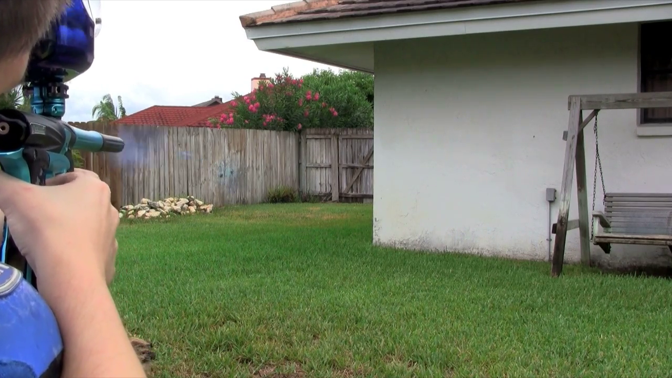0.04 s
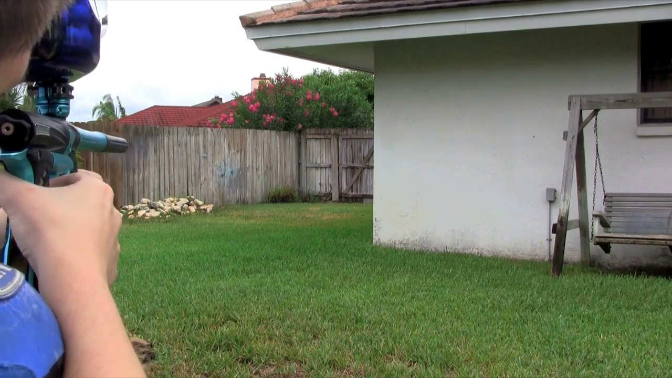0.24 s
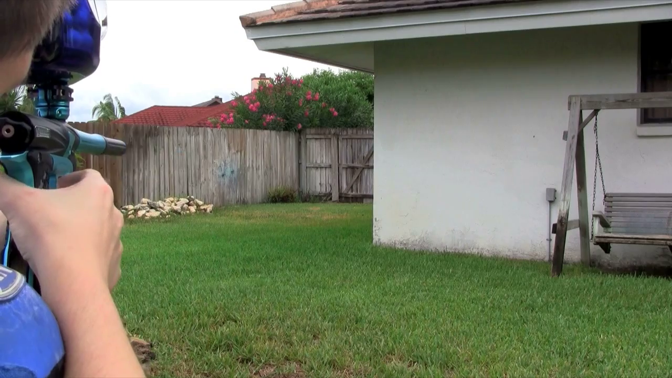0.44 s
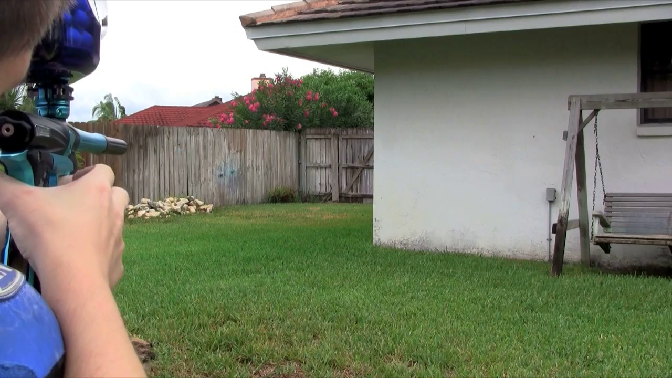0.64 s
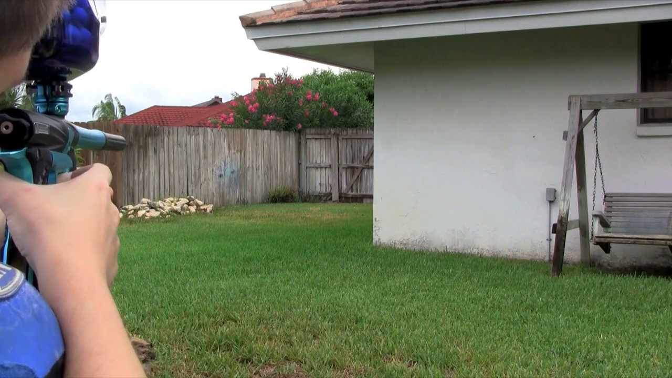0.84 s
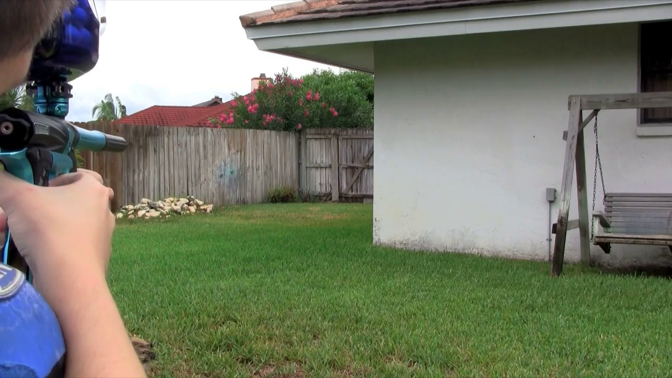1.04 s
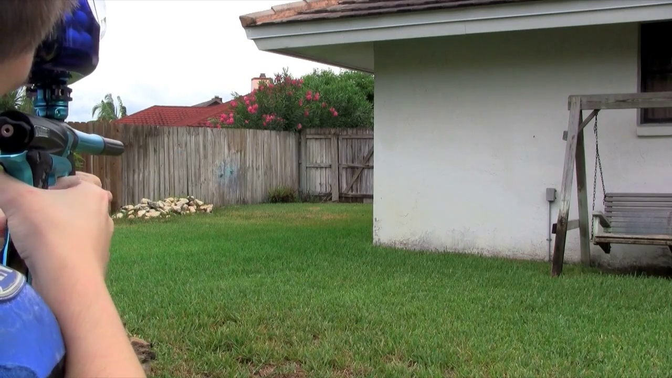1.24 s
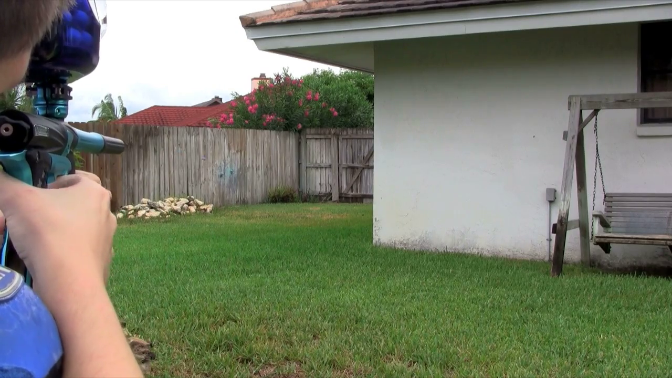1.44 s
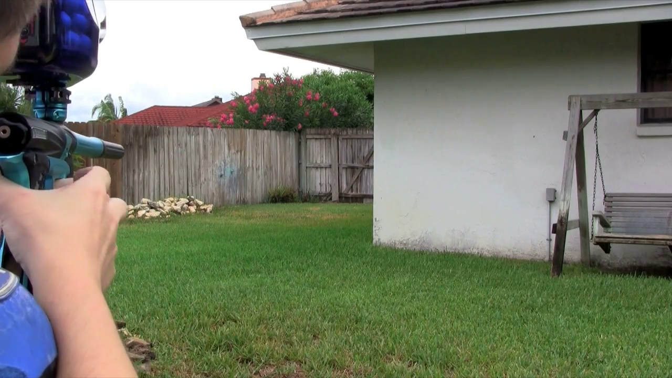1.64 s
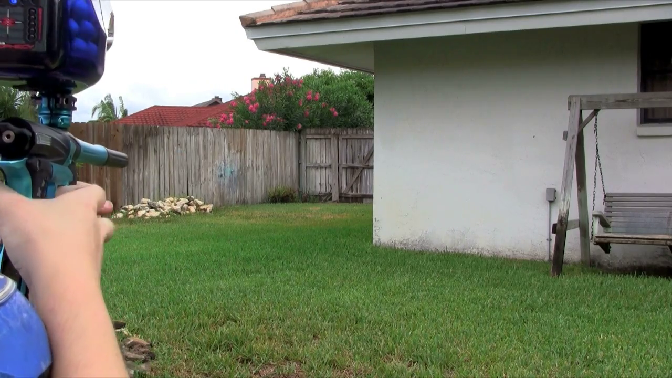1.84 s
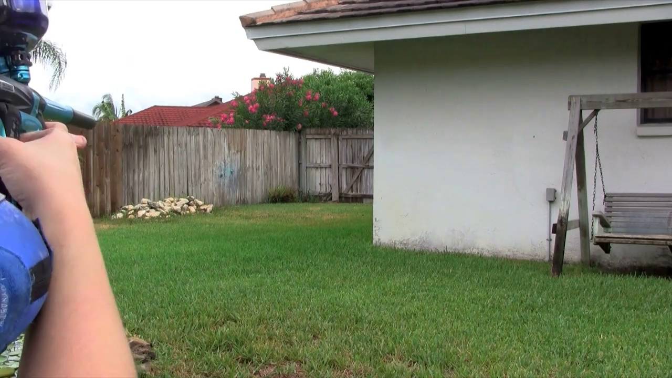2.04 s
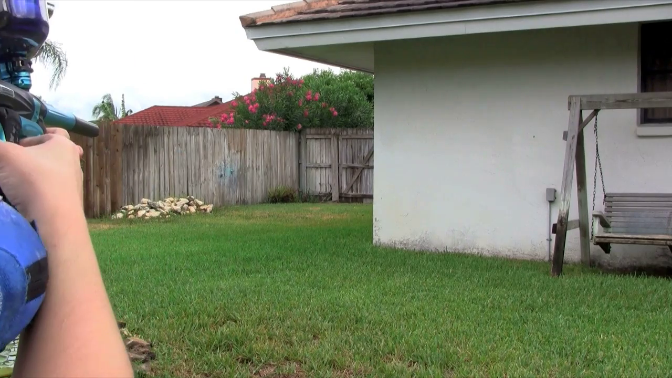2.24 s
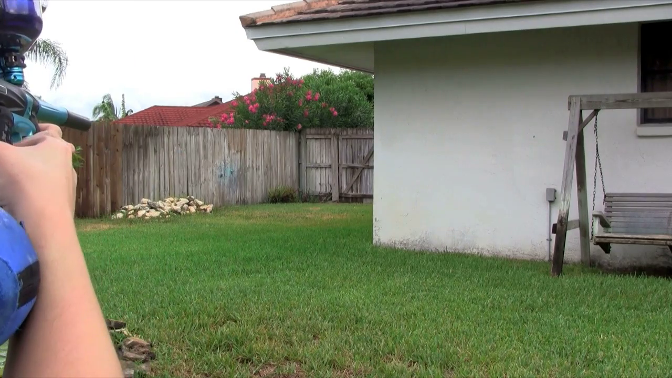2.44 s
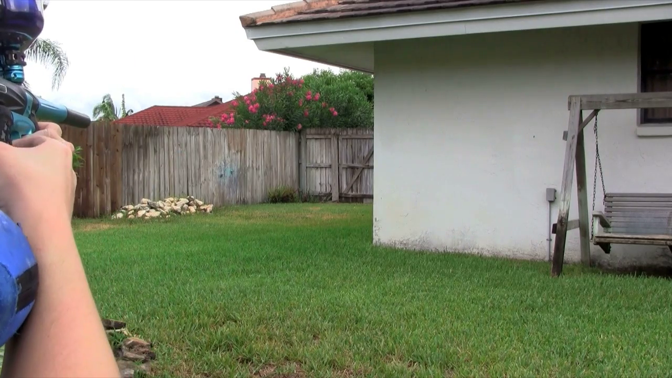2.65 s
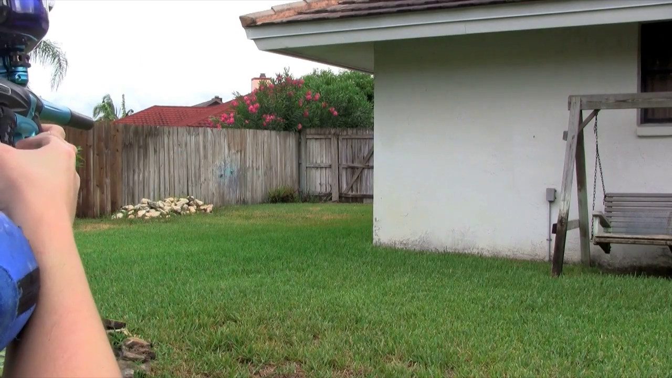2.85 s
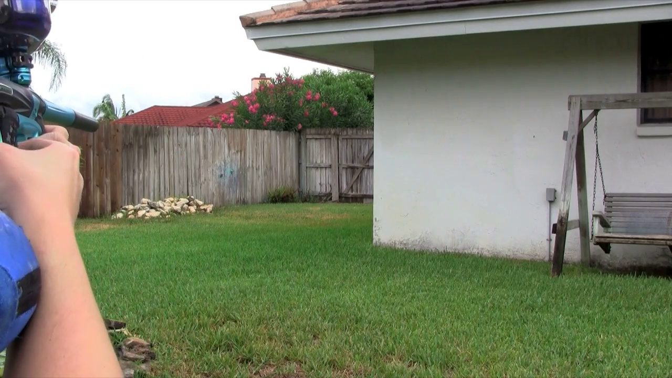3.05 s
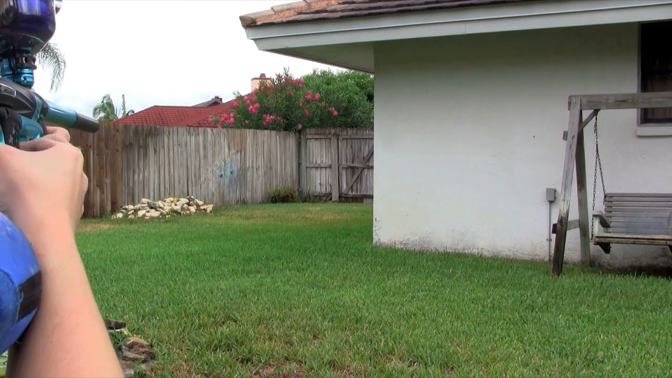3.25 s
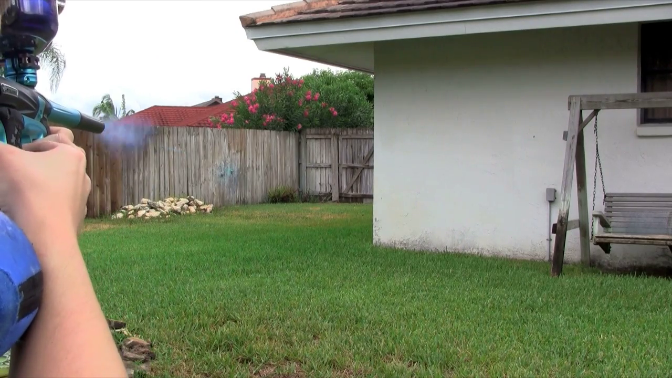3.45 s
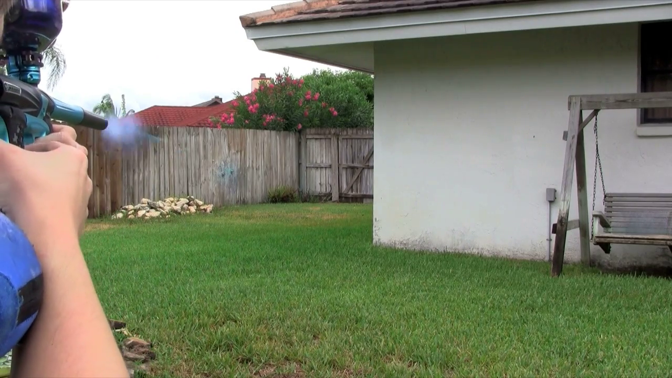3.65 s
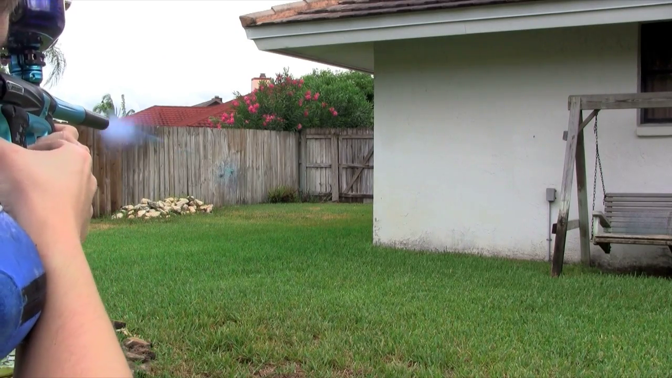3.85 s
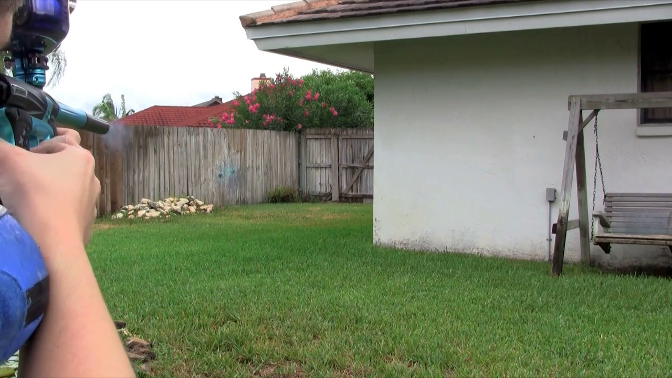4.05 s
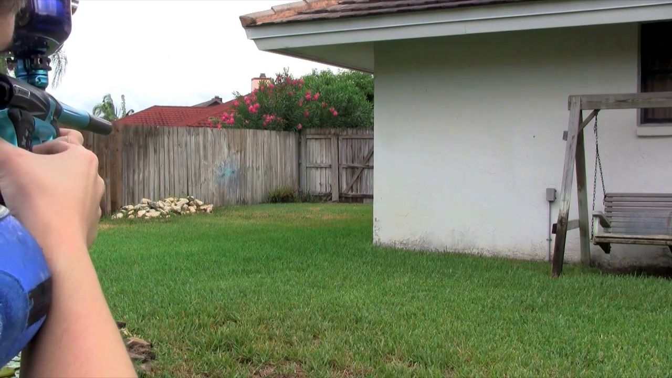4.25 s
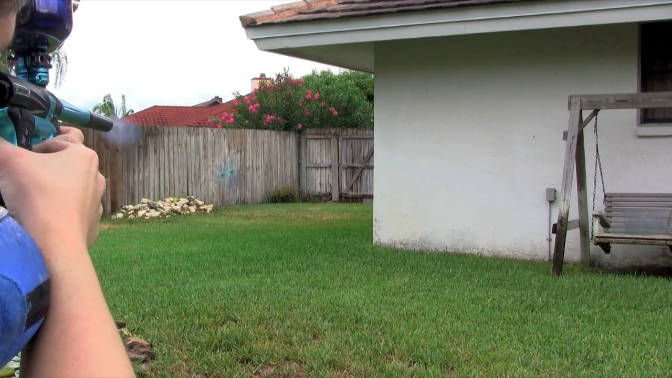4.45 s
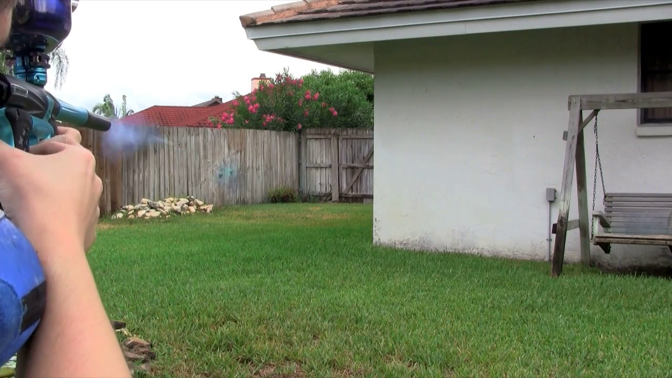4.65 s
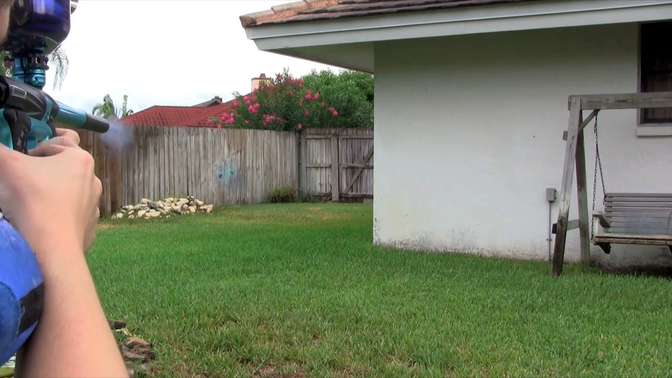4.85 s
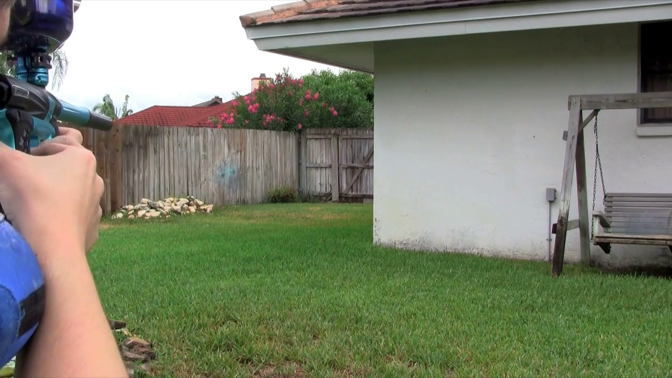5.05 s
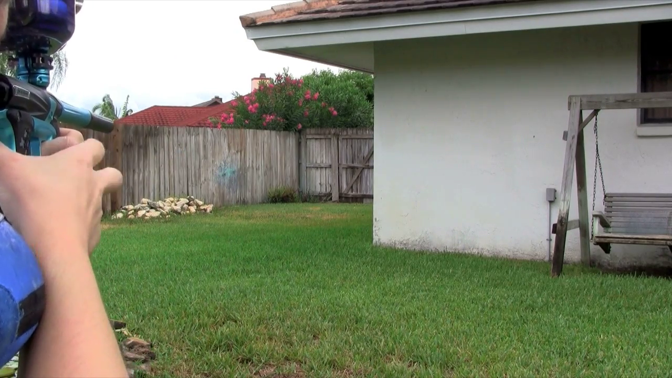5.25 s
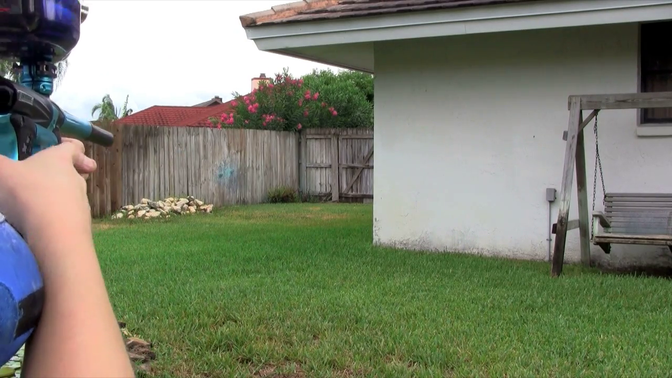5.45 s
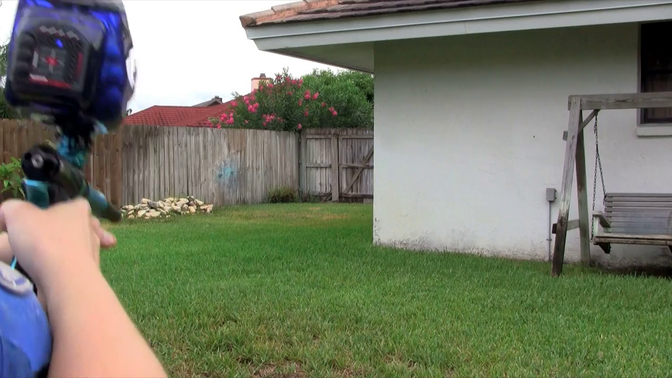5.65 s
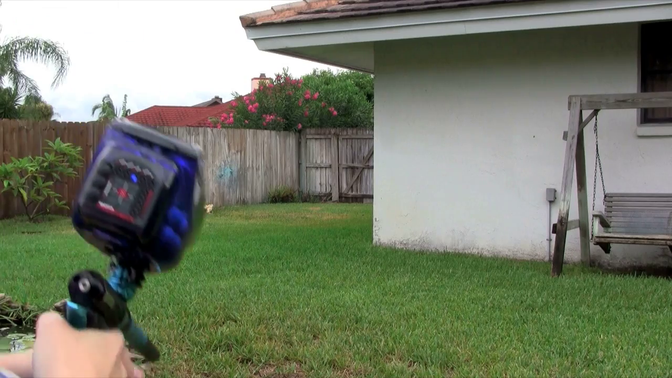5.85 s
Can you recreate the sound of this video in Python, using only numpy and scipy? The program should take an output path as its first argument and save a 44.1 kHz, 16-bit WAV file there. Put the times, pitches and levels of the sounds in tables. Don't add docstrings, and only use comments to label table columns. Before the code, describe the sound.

Dry, loud, gas-driven shots with clacking bolt and short hiss come in a fast ragged run, then two separate shots. The sound dips at a cut; quiet air, faint motor hum and wind thuds lead to roughly two seconds of rapid fire. Sharp cracks return from a wooden fence and the house walls. It closes with hollow plastic rattling near the microphone.

```python
import sys
import numpy as np
from scipy import signal
from scipy.fft import rfft, irfft, next_fast_len
from scipy.io import wavfile

SR = 44100
rng = np.random.default_rng(int(sys.argv[2]) if len(sys.argv) > 2 else 0)


def magnitude_from_level(level_db):
    exponent = np.asarray(level_db, float) / 20
    return 10 ** exponent


def dump(signal):
    limited = np.clip(np.atleast_2d(signal).T, -1, 1)
    pcm = np.round(limited * 32767).astype(np.int16)
    wavfile.write(sys.argv[1], SR, pcm)


N = 260612
MS = np.arange(SR // 5) * 1000 / SR - 10

# t/s, level/dB
AIR_LEVEL = [(0, -35.5), (.8, -47.5), (1.1, -54), (1.7, -43.5), (2.5, -45.5), (3.05, -46), (3.25, -38),
             (5.4, -38.5), (5.6, -52.5)]
# f/Hz, level/dB per Hz
AIR_COLOUR = [(120, -18), (200, -3), (387, -13), (473, -4), (647, -8.5), (749, -7), (1230, -9), (1400, -7),
              (1810, -17.5), (2910, -18), (3690, -21.5), (4430, -21.5), (7010, -24.5), (11300, -22.5),
              (16000, -45)]
# f/Hz, pitch waver/Hz, level/dB
HUM_TONES = [
    (118.4, 4, -52),
    (1357, 1.2, -58.5),
]
# f/Hz, level/dB per Hz
WIND_COLOUR = [(15, -62), (25, -21), (118, -1.5), (168, -3), (227, -8.5), (336, -11.5), (400, -14),
               (520, -47), (880, -120)]
# t/s, level/dB, rise/s, fall/s
GUSTS = [(1.27, -56, .04, .1), (1.4, -51, 0.14, .02), (2.0, -52.5, 0.15, 0.16), (2.3, -47.5, .3, .3),
         (2.47, -45, .04, .06), (2.56, -45.5, 0.025, 0.086), (2.7, -64, 0.18, 0.18),
         (2.855, -42, 0.076, 0.064), (2.91, -42, .1, 0.091), (2.962, -35, 0.039, 0.021),
         (3.016, -31.5, 0.021, 0.042), (3.2, -48, 0.3, 0.69)]
# f/Hz, level/dB per Hz
THUMP_COLOUR = [(18, -10.5), (40, -3), (70, -7), (110, -7), (170, 6.5), (230, -1), (330, -42.5)]
# f/Hz, likeness/1
LIKENESS = [(60, 1), (150, 0.78), (400, 0.91), (1400, 0.97), (3000, 1), (6000, 0.74), (10000, 1),
            (15000, .65)]
# f/Hz, phase/rad
PORT_LEAD = [(200, 0.3), (4000, 0.17), (8000, 0.7), (12300, 1.54), (16000, 1.3)]
# f/Hz, width/Hz, level/dB
HOPPER_MODES = [(360, 42, -11), (465, 54, -3), (610, 73, -5), (854, 72, -5.5), (1050, 80, -1.5),
                (1375, 76, -6), (1550, 110, -5), (2100, 540, -18), (2700, 270, -11)]
# t/s, level/dB
TUMBLE_SURGES = [
    (5.665, -42),
    (5.735, -29.5),
    (5.785, -33.5),
    (5.85, -37),
    (5.868, -40),
    (5.9, -37),
]
# t/s, peak/dB
TICKS = [(.028, -26), (.127, -24), (.583, -23), (1.4138, -13), (1.691, -38), (1.789, -32), (1.936, -38),
         (5.459, -32), (5.564, -26), (5.646, -25), (5.865, -39)]
# t/s, level/dB
FEED_BUMPS = [
    (2.514, -33.5),
    (3.0, -46),
]
# t/ms, level/dB, spread/ms
WALL_RETURNS = [
    (30, -6, 5),
    (51, 4, 4),
    (61, 1, 3),
    (109, 5, 6),
    (133, 1, 7),
]
# f/Hz, level/dB per Hz
YARD_COLOUR = [(88, -49), (150, -7), (294, 1), (477, 8.5), (556, -5), (1030, 10), (1180, -20), (1430, -8.5),
               (1950, -3), (3090, -19.5), (6810, -20), (8920, -17.5), (15000, -39)]
# f/Hz, t60/s
YARD_T60 = [(200, 0.12), (1000, 0.59), (4000, 1), (12000, 1)]
# t/s, crack peak/dB, plank level/dB
SPLATS = [(0.0131, -14, -25.5), (0.3557, -21, -41), (0.415, -26, -35), (0.703, -12, -27),
          (0.8142, -12.5, -34.5), (0.9049, -11, -27.5), (1.6722, -6.5, -21), (1.8337, -6.5, -21),
          (3.361, -9.5, -30), (3.7687, -14, -26), (4.1734, -20, -32), (4.351, -25, -46), (4.416, -25, -34),
          (4.8881, -12.5, -36), (5.2044, -13, -48), (5.4407, -20, -30), (5.5487, -13.5, -23.5),
          (5.6311, -13, -29)]
# f/Hz, level/dB per Hz
SHELL_COLOUR = [(290, -30), (500, -22), (1340, -1), (3590, 2.5), (4730, -9.5), (8450, 3), (10100, -1.5),
                (11500, 3), (14500, -10), (16000, -28)]
# t/ms, f/Hz, signed height/1, held/ms, t60/ms
SHELL_SNAP = [
    (0, 3300, .5, .12, 2.2),
    (.05, 9500, .45, .1, 1.6),
    (1.4, 8500, -.25, .1, 2),
]
# f/Hz, level/dB, four times the t60/s
PLANK_MODES = [(820, 9.5, 0.27), (1016, 3.5, 0.17), (1384, 6, 0.072), (1710, -7.5, 0.093),
               (1981, -16, 0.032), (2280, -24, 0.014), (3300, 4, 0.2), (4300, -17, 0.016)]
# t/ms, level/dB
FENCE_ECHOES = [
    (1.4, -13),
    (16, -9),
    (28.5, -14),
    (101, -29),
]
# f/Hz, level/dB per Hz
SPLAT_TAIL_COLOUR = [(150, -63), (250, -32), (411, -36), (505, -7), (711, -1.5), (1170, -3), (1410, -1),
                     (1950, -11), (5370, -20.5), (9130, -20), (15000, -33)]
# t from blast/ms, f/Hz, signed height/1, held/ms, t60/ms
SWINGS = [(-5.05, 2100, -.2, .4, 4), (-4.2, 660, .19, 2.2, 3), (-3.7, 1000, -.16, 1.4, 7),
          (-2.9, 380, .13, 1, 4), (-2.55, 1300, .12, .4, 4), (-1.4, 560, -.21, .6, 4),
          (-.5, 620, -.21, 1.3, 6), (-.24, 3900, -.4, .2, 2.2), (-.1, 8800, -.2, .15, 2.5),
          (1.9, 1900, .1, .3, 4), (2.6, 260, -.06, 2, 20), (4.9, 400, .23, 1.9, 4),
          (7.4, 400, .185, 3.8, 11), (15.2, 380, .04, 3.5, 38), (36.8, 4250, .02, 1.5, 18),
          (36.9, 950, .03, 1.5, 15), (47.8, 900, .042, 4.5, 20), (58, 1000, .025, 2, 12),
          (105, 950, .018, 7, 30)]
# t from crest/ms, f/Hz, signed height/1, held/ms, t60/ms
POP_SWINGS = [
    (-1.15, 800, -1.0, .62, 1),
    (-.52, 430, .95, .5, 9),
    (-.45, 1000, .24, .5, 5),
    (4.95, 450, .36, .5, 6),
]
# t from blast/ms, level/dB, held/ms, t60/ms
PUFFS = [
    (-5, 2, 2.2, 10),
    (-.2, 5.5, 0.9, 7),
    (1.5, -9.5, 6.8, 80),
    (7, -12, 1.7, 12),
    (36.5, -15, 1.1, 14),
    (39.5, -13.5, 1.3, 90),
]
# t from pop crest/ms, level/dB, held/ms, t60/ms
POP_PUFFS = [
    (-4.5, -33, 3.5, 5.9),
    (-1.0, -11.5, 1.06, 10.6),
    (-0.5, -25.5, 14, 55),
]
# f/Hz, level/dB per Hz
GAS_COLOUR = [(710, 8.5), (1200, 1), (2450, -5), (4650, -4), (6100, -10), (7020, -7.5), (8000, -6),
              (8720, -2), (10100, -7), (11100, -3.5), (13000, -10.5), (14400, -13.5), (16000, -25)]
# t of blast/s, level/dB
SHOTS = [(0.091, 0.9), (0.1396, -2.3), (0.1935, 0.2), (0.241, -1.8), (0.2995, -0.5), (0.38, 0.4),
         (0.4352, -0.3), (0.5496, 1.4), (0.6421, 2.1), (1.4389, 1.4), (1.5721, 3.2),
         (3.1068, -0.1), (3.3266, 1.8), (3.4237, -0.2), (3.5039, -0.4), (3.6, 2.4), (3.6816, -2.3),
                (3.7342, 0.3), (3.8078, 0.9), (3.8573, -3.1), (3.9069, -2.3), (3.9548, -2.0),
                (4.0085, -1.2), (4.0738, 0.4), (4.1377, 0.3), (4.2187, -1.8), (4.3129, -0.5),
                (4.3739, -1.7), (4.4534, 0.9), (4.5041, -1.5), (4.5595, -1.8), (4.6179, 0.0), (4.7037, 1.4),
                (4.7512, -2.6), (4.8048, -0.5), (4.9496, -1.2), (5.0183, 1.0), (5.092, 0.4), (5.1742, 0.5),
                (5.2828, 1.4), (5.3632, 1.3)]
SHOT_S, BLAST_DB = np.transpose(SHOTS)

AIR_FLUTTER_DB, BREEZE_DB, BREEZE_LUMP_DB, GUST_DEPTH_DB = 1.6, -60.5, 3.5, 15.5
THUMP_DB, THUMP_HELD_MS, THUMP_T60_MS = -36, 10.4, 116
HUM_WAVER_DB, DUCK_DB, RECOVER_DB_PER_S, TUMBLE_DUCK_DB = 1.5, 13.5, 22.5, 6
TUMBLE_S, KNOCKS_PER_S, TUMBLE_DB, SWELL_DB_PER_S, SURGE_S = 5.64, 1300, -34.5, 13, 0.017
YARD_SHOT_DB, SCATTER_DB, SNAP_DB = -40.5, -11, -7
SWING_SCATTER_DB, SLIP_MS, PITCH_SLIP = 1.1, .04, .018
LOADER_PER_S, LOADER_DB, GAS_CUT_HZ = 170, -21.5, 750
POP_DB, SINK_DB, SINK_LIMIT_DB, CLIMB_DB_PER_S, OPENING_SINK_DB = -.6, 8.2, 13.6, 28, 8.5
HURRIED_GAP_S, HURRY_FADE_S, HURRY_LOSS_DB = .048, .009, 2.2
HISS_DB, HISS_KNEE_DB, HISS_FOLLOWS = -14, 9, 0.57
POP_HISS_FOLLOWS, POP_HISS_DB = 0.82, -2.5
VALVE_LEAD_MS, HURRY_LAG_MS, STICK_MS, STICK_AFTER_S = 16.8, 1.0, .8, 1.0
CUT_S, FADE_OUT_S, FADE_IN_S, CUT_DB, FADE_BEND = 2.125, 0.089, 0.094, -37, 0.98
BODY_CUT_HZ, MIC_CUT_HZ = 112, 45


def at_hz(points, hz):
    f, value = np.transpose(points)
    return np.interp(np.log(hz + 1), np.log(f), value)


def lumps(rate_hz):
    count = int(N * rate_hz / SR) + 2
    return np.interp(np.arange(N) * rate_hz / SR, np.arange(count), rng.standard_normal(count))


def cut(x, order, hz, kind="high"):
    return signal.sosfilt(signal.butter(order, hz, kind, fs=SR, output="sos"), x)


def noise(colour, size=N):
    grid = next_fast_len(size)
    hz = np.arange(grid // 2 + 1) * SR / grid
    mid, side = rfft(rng.standard_normal((2, grid))) * magnitude_from_level(at_hz(colour, hz))
    alike = np.clip(at_hz(LIKENESS, hz), 0, 1)
    sides = np.array([[1], [-1]])
    ports = np.sqrt(1 + alike) * mid + np.sqrt(1 - alike) * side * sides
    ports = ports * np.exp(.5j * at_hz(PORT_LEAD, hz) * sides)
    both = irfft(ports, grid)[:, :size]
    return both / np.sqrt(np.mean(both ** 2))


def dying(ms, held_ms, t60_ms):
    return (ms >= 0) * magnitude_from_level(-60 * np.clip(ms - held_ms, 0, None) / t60_ms)


def played(times_s, db, shape, lead_ms=0):
    clicks = np.zeros(N + SR)
    at = np.round((np.asarray(times_s) + lead_ms / 1000) * SR).astype(int)
    np.add.at(clicks, at, magnitude_from_level(db))
    return signal.oaconvolve(clicks, shape)[:N]


def swings(times_s, db, rows):
    at, hz, height, held, t60 = np.transpose(rows)[:, :, None]
    out, ms = np.zeros(N + SR), MS[:SR // 7]
    chances = rng.standard_normal((len(times_s), 3, len(rows), 1))
    for s, level_db, (slip, strength, pitch) in zip(times_s, db, chances):
        late = ms - at - SLIP_MS * slip
        turn = 2 * np.pi * hz * (1 + PITCH_SLIP * pitch) * late / 1000
        level = height * magnitude_from_level(level_db + SWING_SCATTER_DB * strength)
        wave = level * np.sin(turn) * dying(late, held, t60)
        start = round((s - .01) * SR)
        out[start:start + len(ms)] += wave.sum(axis=0)
    return out[:N]


def resonate(x, hz, width_hz):
    r = np.exp(-np.pi * width_hz / SR)
    return signal.lfilter([(1 - r * r) / 2, 0, (r * r - 1) / 2],
                          [1, -2 * r * np.cos(2 * np.pi * hz / SR), r * r], x)


def compressor():
    t = np.arange(N) / SR
    since_s = t - np.append(0, SHOT_S)[np.searchsorted(SHOT_S, t)]
    hum = 0
    for hz, waver_hz, db in HUM_TONES:
        hum = hum + magnitude_from_level(db + 3.5) * np.sin(2 * np.pi * np.cumsum(hz + waver_hz * lumps(12)) / SR)
    duck_db = np.clip(DUCK_DB - RECOVER_DB_PER_S * since_s, 0, None)
    duck_db = duck_db + TUMBLE_DUCK_DB * np.clip((t - TUMBLE_S + .2) / .1, 0, 1)
    return hum * magnitude_from_level(HUM_WAVER_DB * lumps(14) - duck_db)


def wind():
    t = np.arange(N) / SR
    level = magnitude_from_level(BREEZE_DB + BREEZE_LUMP_DB * lumps(8.6))
    for at, db, rise_s, fall_s in GUSTS:
        away = np.maximum((at - t) / rise_s, (t - at) / fall_s)
        level = level + magnitude_from_level(db - GUST_DEPTH_DB * away)
    return level * noise(WIND_COLOUR)


def background():
    air_db = np.interp(np.arange(N) / SR, *np.transpose(AIR_LEVEL))
    air = magnitude_from_level(air_db + AIR_FLUTTER_DB * lumps(24.68)) * noise(AIR_COLOUR)
    buffet = played(SHOT_S, BLAST_DB + THUMP_DB, dying(MS + 10, THUMP_HELD_MS, THUMP_T60_MS), lead_ms=-14)
    return air + compressor() + wind() + buffet * noise(THUMP_COLOUR)


def hopper():
    start = round(TUMBLE_S * SR)
    t = np.arange(start, N) / SR
    level = magnitude_from_level(TUMBLE_DB + SWELL_DB_PER_S * (t - TUMBLE_S))
    for s, db in TUMBLE_SURGES:
        level = level + magnitude_from_level(db - 4) * np.exp(-((t - s) / SURGE_S) ** 2)
    knocks = (rng.random(N) < KNOCKS_PER_S / SR) * magnitude_from_level(2.7 * np.minimum(rng.exponential(1, N), 3))
    knocks = (knocks * rng.choice([-1, 1], N))[start:]
    shell = 0
    for hz, width_hz, db in HOPPER_MODES:
        strength = rng.normal(0, 1, N - start)
        shell = shell + magnitude_from_level(db) * resonate(knocks * strength + 1e-18, hz, width_hz) / np.sqrt(width_hz)
    shell = shell / shell.std() + magnitude_from_level(-7) * noise(YARD_COLOUR)[:, start:]
    return np.pad(shell * level * magnitude_from_level(1.4 * lumps(120)[start:]), ((0, 0), (start, 0)))


def ticks():
    bump = [(0, 1050, 0.95, 2, 22), (.3, 1270, .5, 1.5, 18), (0, 474, 0.29, 2.8, 40)]
    bumps = swings(*np.transpose(FEED_BUMPS), bump)
    s, db = np.transpose(TICKS)
    return played(s, db, dying(MS + 10, 0.23, 6.5)) * noise(GAS_COLOUR) + bumps


def yard():
    ms = np.arange(SR) * 1000 / SR
    turbulent = 1 + 1.3 * rng.standard_normal(N)
    blows = played(SHOT_S, BLAST_DB + YARD_SHOT_DB, dying(MS + 10, 0.053, 1.63)) * turbulent
    returns = magnitude_from_level(SCATTER_DB) * np.minimum(ms / 15, 1)
    for at, db, spread_ms in WALL_RETURNS:
        returns = returns + magnitude_from_level(db) * np.exp(-((ms - at) / spread_ms) ** 2)
    scatter, answer = noise(YARD_COLOUR, size=SR), 0
    for low_hz in 100 * 2. ** np.arange(7):
        high_hz = 2.4 * low_hz if low_hz > 5000 else 2 * low_hz
        band = cut(scatter, 2, [low_hz, high_hz], "band")
        slope = np.diff(band, prepend=0) * SR / (9 * low_hz)
        answer = answer + slope * returns * dying(ms, 0, 1000 * at_hz(YARD_T60, 1.32 * low_hz))
    return signal.oaconvolve(blows[None], answer, axes=1)[:, :N]


def fence():
    s, crack_db, plank_db = np.transpose(SPLATS)
    ms = MS + 10
    gate = sum(magnitude_from_level(db) * dying(ms - at, 0.15, 7.8) for at, db in [(0.017, 0)] + FENCE_ECHOES)
    crack = played(s, crack_db - 7.0, gate) * noise(SHELL_COLOUR)
    snap = swings(s, crack_db + SNAP_DB, SHELL_SNAP)
    ring = 0
    for hz, db, t60_s in PLANK_MODES:
        ring = ring + magnitude_from_level(db) * np.sin(2 * np.pi * hz * ms / 1000) * dying(ms, 0, 250 * t60_s)
    knock = played(s, plank_db - 14, ring)
    long_ms = np.arange(SR // 2) * 1000 / SR
    tail = played(s, plank_db - 9.5, dying(long_ms - 3, 22.5, 554))
    rough = magnitude_from_level(3.0 * lumps(140) + 0.96 * lumps(760))
    return crack + snap + knock + tail * rough * noise(SPLAT_TAIL_COLOUR)


def valve_levels():
    gap_s = np.diff(SHOT_S, prepend=SHOT_S[0] - 1)
    hurry = np.exp(-np.clip(gap_s - HURRIED_GAP_S, 0, None) / HURRY_FADE_S)
    sunk_db = [OPENING_SINK_DB]
    for pause_s in gap_s[1:]:
        pressed_db = min(sunk_db[-1] + SINK_DB, SINK_LIMIT_DB)
        sunk_db.append(max(pressed_db - CLIMB_DB_PER_S * pause_s, 0))
    loss_db = np.array(sunk_db) + HURRY_LOSS_DB * hurry
    lead_ms = VALVE_LEAD_MS + HURRY_LAG_MS * hurry
    lead_ms = lead_ms + STICK_MS * (gap_s > STICK_AFTER_S + .1)
    hiss_db = HISS_DB - HISS_FOLLOWS * np.clip(loss_db - HISS_KNEE_DB, 0, None)
    return -lead_ms, POP_DB - loss_db, hiss_db


def puffs(rows):
    return sum(magnitude_from_level(db) * dying(MS - at, held, t60) for at, db, held, t60 in rows)


def marker():
    valve_ms, pop_db, hiss_db = valve_levels()
    valve_s = SHOT_S + valve_ms / 1000
    body = swings(SHOT_S, BLAST_DB - .5, SWINGS) + swings(valve_s, pop_db, POP_SWINGS)
    gate = played(SHOT_S, hiss_db, puffs(PUFFS), lead_ms=-10)
    valve_hiss_db = POP_HISS_FOLLOWS * pop_db + POP_HISS_DB
    gate = gate + played(valve_s, valve_hiss_db, puffs(POP_PUFFS), lead_ms=-10)
    jet = cut(noise(GAS_COLOUR), 2, GAS_CUT_HZ)
    clicks = (rng.random(N) < LOADER_PER_S / SR) * magnitude_from_level(3.7 * np.minimum(rng.exponential(1, N), 3))
    clatter = signal.lfilter([1], [1, -.97], clicks)
    clatter = clatter * played(SHOT_S, hiss_db + LOADER_DB, dying(MS, 57, 240))
    return body * magnitude_from_level([[-.8], [.8]]) + (gate * magnitude_from_level(3.25 * lumps(900)) + clatter) * jet


def joint():
    t = np.arange(N) / SR - CUT_S
    ramp = np.clip(np.maximum(-t / FADE_OUT_S, t / FADE_IN_S), 0, 1)
    return np.clip(ramp ** FADE_BEND, magnitude_from_level(CUT_DB), 1)


def scene():
    shooting = hopper() + ticks() + yard() + fence() + marker()
    no_bass = signal.butter(2, BODY_CUT_HZ, "high", fs=SR, output="sos")
    return (background() + signal.sosfiltfilt(no_bass, shooting, padtype=None)) * joint()


def low_pass(x):
    return signal.sosfilt(signal.butter(12, 16660, fs=SR, output="sos"), x)


def record(dry):
    thin = cut(dry, 1, MIC_CUT_HZ)
    limited = .93 * thin / (1 + (.95 * thin) ** 6) ** (1 / 6)
    mix = signal.sosfilt(signal.cheby2(12, 85, 16900, fs=SR, output="sos"), limited)
    return low_pass(mix)


dry = scene()
out = record(dry)
dump(out)
```